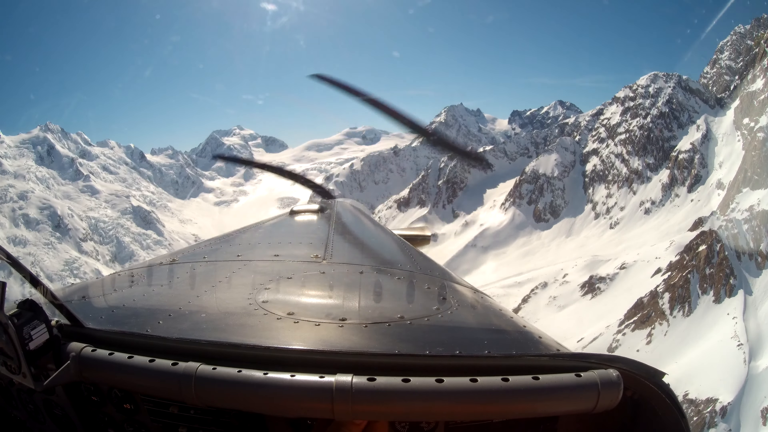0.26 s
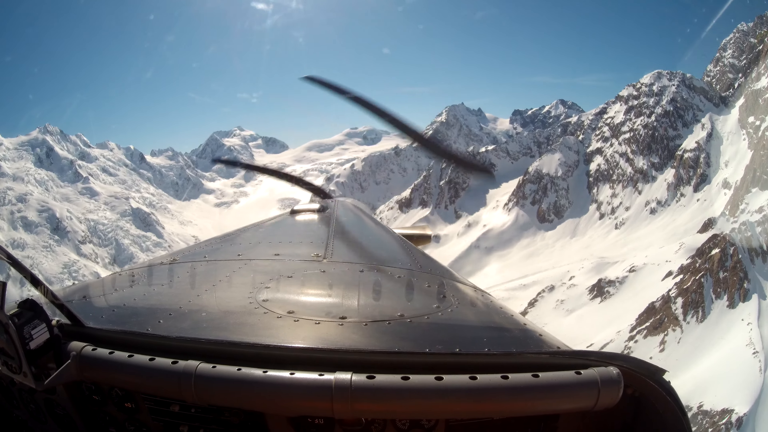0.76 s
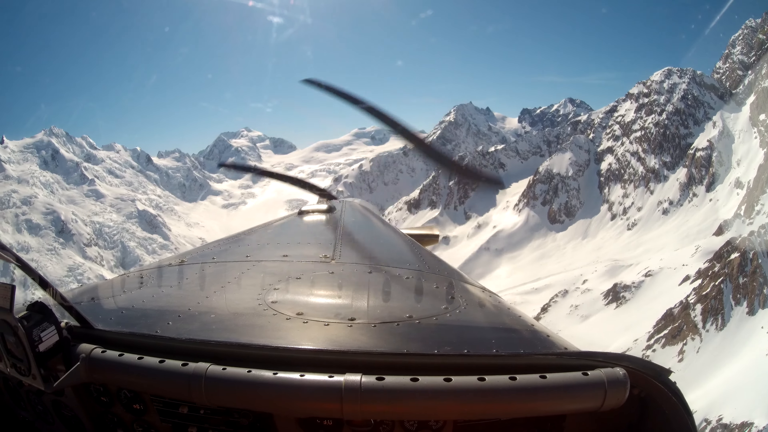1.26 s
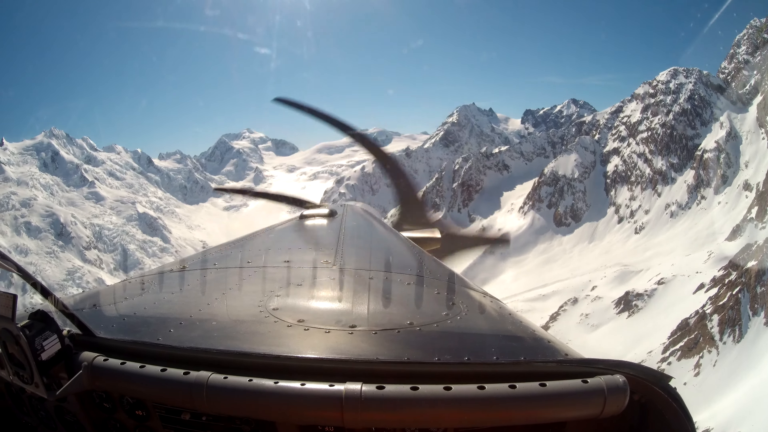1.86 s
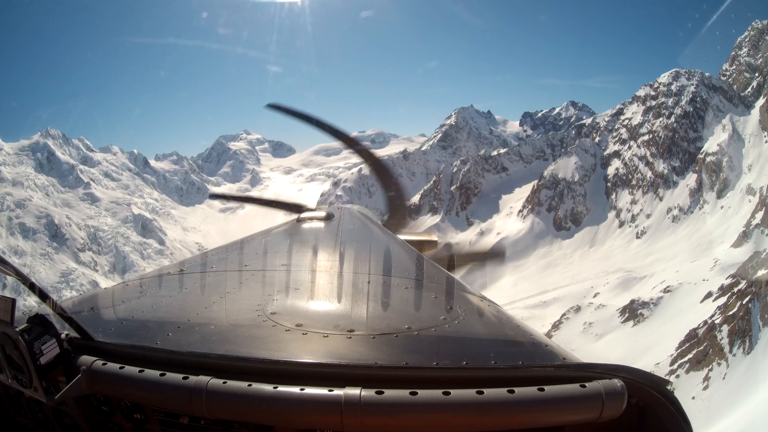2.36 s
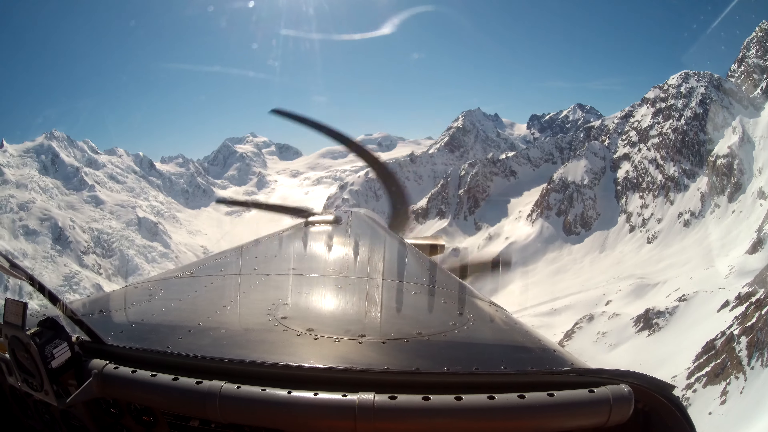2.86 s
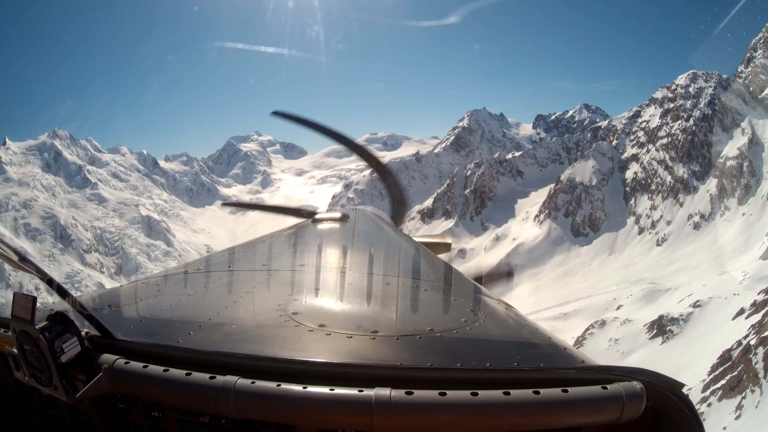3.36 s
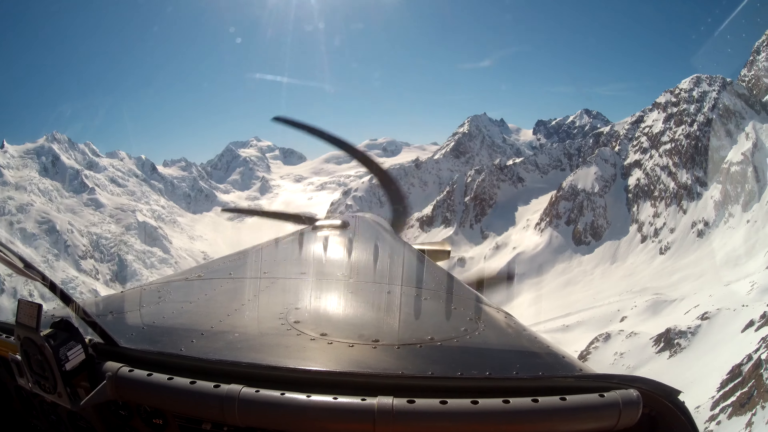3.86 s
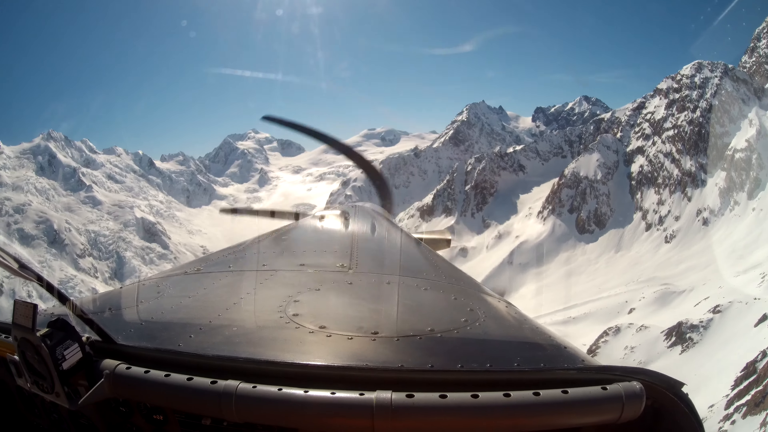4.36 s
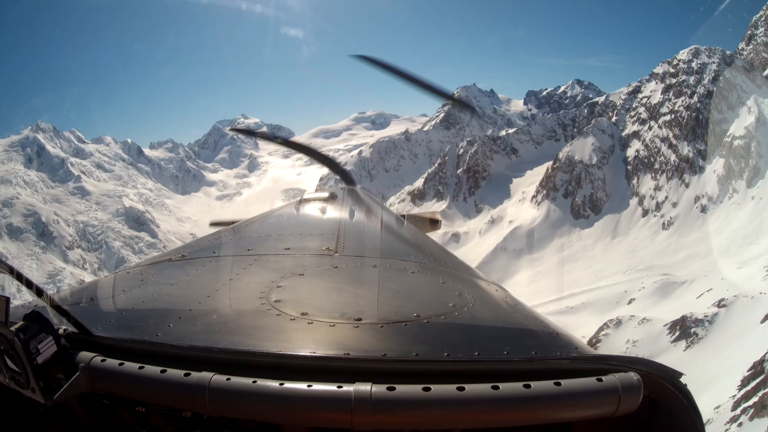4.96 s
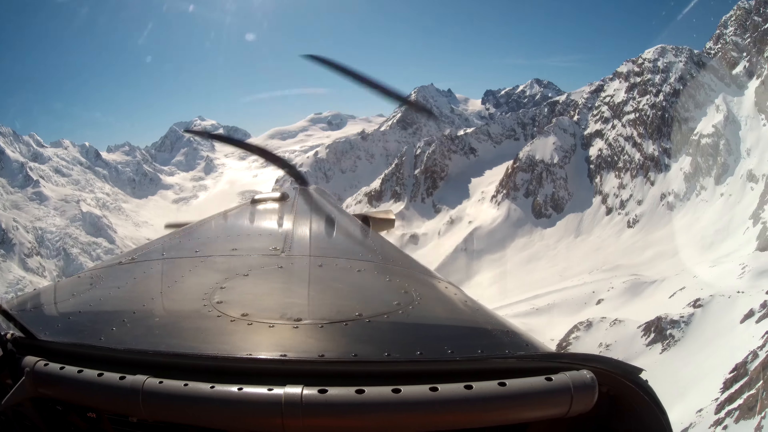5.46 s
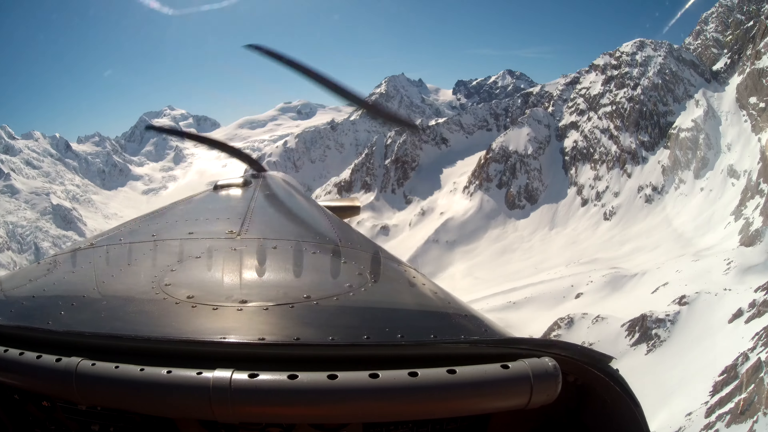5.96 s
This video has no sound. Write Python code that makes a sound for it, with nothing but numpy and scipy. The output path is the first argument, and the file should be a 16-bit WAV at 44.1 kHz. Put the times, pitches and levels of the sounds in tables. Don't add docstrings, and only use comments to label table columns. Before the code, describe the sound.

Heard from a small camera close behind a light aircraft's windscreen: a loud, continuous propeller and engine drone, low and buzzy, almost constant in pitch. Turbulent air booms and drums on the cabin skin, while hiss leaks past the seals in small gusts. A thin, faint whistle flickers high above, flaring more strongly in the last two seconds. The sound is dense, compressed and slightly overloaded.

```python
import sys
import numpy as np
from scipy import signal
from scipy.fft import rfft, irfft
from scipy.io import wavfile
from scipy.ndimage import uniform_filter1d

SR = 44100
rng = np.random.default_rng(int(sys.argv[2]) if len(sys.argv) > 2 else 0)


def put_to_file(sound):
    columns = np.atleast_2d(sound).T
    safe = np.clip(columns, -1, 1)
    whole_steps = np.round(safe * 32767)
    wavfile.write(sys.argv[1], SR, whole_steps.astype(np.int16))


def volts_from_decibels(level):
    exponent = np.asarray(level, float) / 20
    return 10 ** exponent


N = 274743

# t/s, rush of air level/dB, cabin buffeting level/dB
AIRFLOW = [(0.0, -42, 1.5), (.4, -37.5, 1), (.8, -40, 1), (1.3, -40, 0.5), (1.8, -40.5, 0.5),
           (2.35, -40, 0.5), (2.72, -42, 0), (3.1, -40.5, -0.5), (3.5, -40.5, -1.5), (4.1, -39.5, -1.5),
           (4.9, -37.5, -2), (5.4, -37, -.5), (5.7, -39, 0), (5.95, -39.5, -3), (6.23, -38.5, 2.5)]


def curves(table):
    s, *columns = np.transpose(table)
    return [np.interp(np.arange(N) / SR, s, column) for column in columns]


def bumps(events):
    t = np.arange(N) / SR
    return sum(db * np.exp(-(2 * (t - s) / length) ** 2) for s, db, length in events)


def noise(gain):
    hz = np.maximum(np.arange(N // 2 + 1) * SR / N, 1)
    x = irfft(rfft(rng.standard_normal(N)) * gain(hz), N)
    return x / x.std()


def coloured(points):
    hz, db = np.transpose(points)
    return noise(lambda f: volts_from_decibels(np.interp(np.log(f), np.log(hz), db, -200, -200)))


def walk(rate_hz):
    return noise(lambda f: 1 / (1 + (f / rate_hz) ** 2))


def butter(x, hz, kind):
    return signal.sosfilt(signal.butter(2, hz, kind, fs=SR, output="sos"), x)


def propeller(wander_db=2.5, rough_db=2.1, drift_db=0.5):
    # t/s, shaft f/Hz, exhaust bark level/dB, blade loading level/dB (+ blade pass, - its octave)
    shaft = [(0.0, 32.58, 4, 2), (.4, 32.57, 1.5, 2), (.8, 32.63, 1.5, -1.5), (1.1, 32.69, 0, -0.5),
             (1.42, 32.67, 1.5, 0), (1.85, 32.61, 1.5, -3), (2.1, 32.55, -2.5, 1), (2.45, 32.57, -5, 1.5),
             (2.8, 32.51, -7, -2), (3.15, 32.6, -3, 1), (3.9, 32.62, 0.5, -2), (4.25, 32.6, 1, 1.5),
             (4.9, 32.67, 2, 1.5), (5.35, 32.73, 3.5, -2), (5.65, 32.74, -1, 3), (5.95, 32.74, -1, -2),
             (6.23, 32.65, 0, 3)]
    strong_orders = (3, 6, 9, 12, 18, 21, 24, 30)
    # level/dB, shares of exhaust bark, cabin buffeting and blade loading [dB per dB]
    strong_levels = [(-17.5, 0.15, -0.36, 0.84), (-19, -0.11, -0.088, -0.78), (-31, -0.1, -1.7, -0.42),
                     (-31.5, .1, -0.34, 0.25), (-32.5, 1.2, 0.35, 0.14), (-41.5, .7, -.4, 0.22),
                     (-44.5, -0.018, 0., 0.18), (-49, 1.1, -0.43, 0.066)]
    # multiple of the shaft rate, level/dB
    weak_orders = [(1, -31), (7, -57), (8, -62), (10, -34.5), (11, -67), (13, -49.5), (15, -47.5),
                   (16, -70), (17, -46), (19, -47), (23, -53.5), (25, -50), (27, -53), (31, -73), (33, -79),
                   (36, -66)]
    # t/s, level/dB, length/s
    cowling_swells = [
        (1.52, 7, .6),
        (3.5, 5, .5),
        (4.08, -14, 0.4),
    ]
    cowling_order = 30
    phase_lag, exhaust_turns = .02, .1485

    hz, bark_db, loading_db = curves(shaft)
    buffeting_db = curves(AIRFLOW)[1]
    turn = 2 * np.pi * np.cumsum(hz) / SR
    orders = []
    for k, (db, bark, buffeting, loading) in zip(strong_orders, strong_levels):
        level_db = db + bark * bark_db + buffeting * buffeting_db + loading * loading_db
        level_db = level_db + drift_db * np.log(k / 2) * walk(1.5)
        if k == cowling_order:
            level_db = level_db + bumps(cowling_swells)
        orders.append((k, level_db))
    for k, db in weak_orders:
        orders.append((k, db + wander_db * walk(0.73)))

    hum = np.zeros(N)
    for k, level_db in orders:
        late = k * phase_lag * np.log(k)
        if k > 6:
            late += k * 2 * np.pi * exhaust_turns
        hum += 2 ** .5 * volts_from_decibels(level_db + rough_db * walk(14.5)) * np.cos(k * turn - late)
    return hum


def airflow(flutter_db=0.56, skin_flutter_db=1.5, throb_db=.8, whistle_share=0.58, brighten=0.33):
    # t/s, level/dB, length/s
    gusts = [(.45, 0, .1), (.87, 1, 0.061), (1.73, 1.5, 0.17), (2.13, -5, .12), (2.4, 1, .2),
             (2.87, 4.5, 0.13), (3.36, 3, 0.08), (3.78, 3, .12), (4.12, 3, 0.089), (4.22, -2.5, 0.13),
             (4.35, 2.5, 0.16), (4.57, 3, 0.092), (4.68, -1.7, 0.087), (4.85, 4, .14), (5.18, 2, .2),
             (5.48, 3.5, .1), (6.03, -3, .1)]
    # f/Hz, level/dB
    boom_spectrum = [(12, -32), (30, -1.5), (60, -9.5), (90, -0.5), (130, -1.5), (160, -5), (200, -7),
                     (230, -13.5), (300, -9.5)]
    # f/Hz, level/dB
    drum_spectrum = [(180, -21), (240, -9), (320, -0.5), (420, -1.5), (480, -5.5), (620, -7), (800, -13),
                     (1200, -17), (1700, -22.5), (2200, -33.5)]
    # f/Hz, level/dB
    hiss_spectrum = [(1500, -1.5), (2100, -4), (2800, 0.5), (3500, -0.5), (4500, -4.5), (6500, -4.5),
                     (9000, -4.5), (12500, -5), (14000, -8), (15300, -14)]
    # f/Hz, width/Hz, level/dB
    cavities = [(9470, 150, -43.5), (9900, 830, -51), (2570, 530, -51)]
    boom_db, drum_db, hiss_db = -24 + 5.5, -31.5 + 5.0, 2.0
    skin_share = 0.67

    rush_db, buffeting_db = curves(AIRFLOW)
    gust_db = rush_db + bumps(gusts)
    swell_db = gust_db - gust_db.mean()
    boom = volts_from_decibels(boom_db + buffeting_db + throb_db * walk(5.8)) * coloured(boom_spectrum)
    skin_db = drum_db + skin_share * swell_db + skin_flutter_db * walk(11)
    drum = volts_from_decibels(skin_db) * coloured(drum_spectrum)
    hiss = volts_from_decibels(gust_db + hiss_db + flutter_db * walk(16)) * coloured(hiss_spectrum)
    mid_treble = butter(butter(hiss, 4200, "high"), 8500, "low")
    hiss = hiss + (volts_from_decibels(brighten * swell_db) - 1) * mid_treble
    cavity = np.zeros(N)
    for hz, width, db in cavities:
        cavity += volts_from_decibels(db) * noise(lambda f: 1 / np.hypot(1, 2 * (f - hz) / width))
    return boom + drum + hiss + volts_from_decibels(whistle_share * swell_db + flutter_db * walk(11)) * cavity


def electrics(fade_db=2.0, wobble_rad=0.5, thin_db=5.0, thin_fade_db=0.2):
    # multiple of the clock, level/dB
    steady_lines = [(2, -54), (3, -60)]
    # multiple of the clock, level/dB, gain once the load shifts/dB
    thin_lines = [(7, -62.5, -1), (9, -61.5, -11), (6, -72, 10)]
    # t/s, level/dB
    flares = [(.15, 7), (.49, 7), (.74, 9), (1.11, 6), (1.7, 8), (1.98, 12), (2.2, 6), (2.44, 7), (2.63, 9),
              (2.83, 10), (3.07, 9), (3.78, 13), (4.06, 16), (4.54, 15), (4.92, 19.5), (5.21, 20), (5.4, 7),
              (5.63, 19), (6.11, 13)]
    # t/s, level/dB, length/s
    panel_swells = [
        (2.4, 3.5, .4),
        (3.75, 3, .5),
        (4.5, -7, .6),
        (5.65, 8.5, 0.89),
    ]
    clock_hz, panel_hz, panel_db = 592.23, 2771.8, -60.5
    load_shift_s, shift_length_s = 3.085, .08
    whistle_db, whistle_shift_db, flare_s = -46.5 - 2.5, -6.5, 0.15

    t = np.arange(N) / SR
    shifted = 1 / (1 + np.exp((load_shift_s - t) / shift_length_s))
    lines = []
    for k, db in steady_lines:
        lines.append((k * clock_hz, db + fade_db * walk(.7)))
    for k, db, gained_db in thin_lines:
        level_db = db + thin_db + gained_db * shifted + thin_fade_db * walk(1.2)
        lines.append((k * clock_hz, level_db))
    flare_db = bumps([(s, db, flare_s) for s, db in flares])
    lines.append((16 * clock_hz, whistle_db + whistle_shift_db * shifted + flare_db + fade_db * walk(12)))
    lines.append((panel_hz, panel_db + thin_db + bumps(panel_swells) + fade_db * walk(13)))

    whine = np.zeros(N)
    for hz, level_db in lines:
        whine += 2 ** .5 * volts_from_decibels(level_db) * np.sin(2 * np.pi * hz * t + wobble_rad * walk(4.3))
    return whine


def scene():
    return (propeller() + airflow() + electrics())[None]


def outer_port(dry, housing_hz=295, ring=-2.24, buffet_db=-19, ceiling=.28, bottom=.42, knee=0.022):
    # f/Hz, level/dB
    buffet_spectrum = [(14, -12), (28, 0), (50, -3), (130, -7), (400, -11), (750, -27)]
    ringing = signal.lfilter(*signal.iirpeak(housing_hz, 4, fs=SR), dry)
    port = dry + ring * ringing + volts_from_decibels(buffet_db) * coloured(buffet_spectrum)
    port = ceiling - knee * np.logaddexp(0, (ceiling - port) / knee)
    return knee * np.logaddexp(0, (port + bottom) / knee) - bottom


def leveller(mix, memory_s=0.088, share=0.21):
    memory = int(memory_s * SR)
    power = uniform_filter1d(mix ** 2, memory, origin=memory // 2 - 1)
    return mix * (power / power.mean()) ** (-share / 2)


def low_pass(x):
    return signal.sosfilt(signal.butter(12, 15650, fs=SR, output="sos"), x)


def record(dry, split_hz=1030, leak=.13, gain_db=-0.64, squash=.7):
    treble = butter((1 - leak) * outer_port(dry) + leak * dry, split_hz, "high")
    mix = butter(dry, split_hz, "low") - treble
    mix = butter(butter(mix, 95.8, "high"), 25, "high")
    mix = leveller(mix)
    mix = np.tanh(squash * volts_from_decibels(gain_db) * mix) / squash
    mix = signal.sosfilt(signal.ellip(12, .2, 90, 15270, fs=SR, output="sos"), mix)
    return low_pass(mix)


dry = scene()
out = record(dry)
put_to_file(out)
```